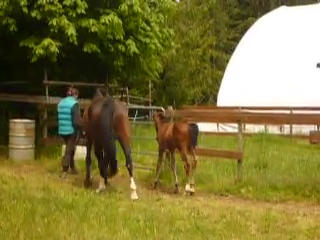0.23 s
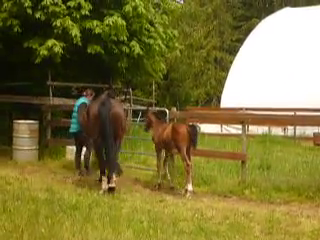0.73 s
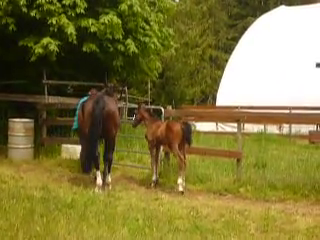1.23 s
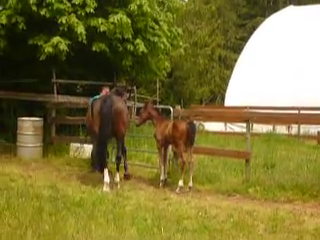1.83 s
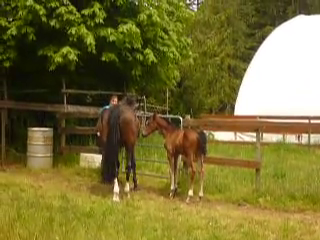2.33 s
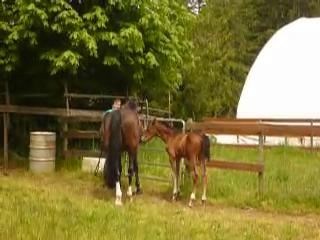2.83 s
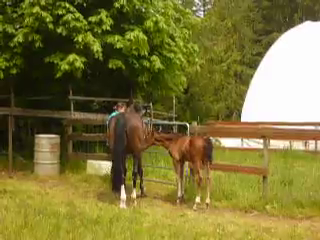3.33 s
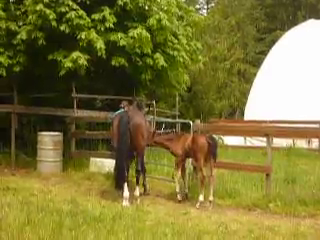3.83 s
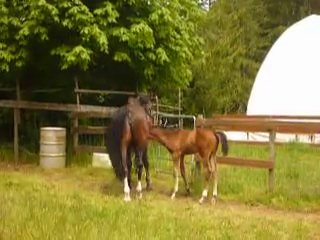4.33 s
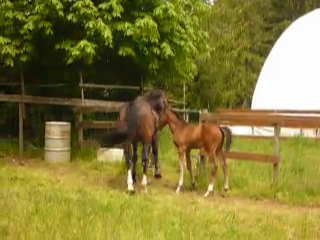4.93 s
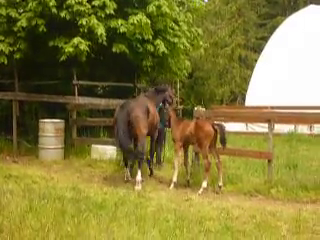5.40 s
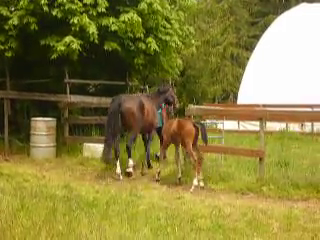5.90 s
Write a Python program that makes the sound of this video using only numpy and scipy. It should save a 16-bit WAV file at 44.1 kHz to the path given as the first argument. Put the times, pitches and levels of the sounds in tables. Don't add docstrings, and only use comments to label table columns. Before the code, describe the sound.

A horse whinnies loudly at once in an open paddock, then ticks, hoof scuffs and metal rings, before a longer quavering whinny and a blown breath.

```python
import sys
import numpy as np
from scipy import signal
from scipy.fft import rfft, irfft
from scipy.io import wavfile
from scipy.ndimage import uniform_filter1d

SR = 44100
rng = np.random.default_rng(int(sys.argv[2]) if len(sys.argv) > 2 else 0)


def volts_from_db(level):
    exponent = np.asarray(level, float) / 20
    return 10 ** exponent


def file_out(sig):
    cols = np.atleast_2d(sig).T
    lim = np.clip(cols, -1, 1)
    pcm = np.round(lim * 32767).astype(np.int16)
    wavfile.write(sys.argv[1], SR, pcm)


N = 271700
TIME, HZ = np.arange(N) / SR, np.fft.rfftfreq(N, 1 / SR)

# f/Hz, level per Hz/dB
HUSH_SPECTRUM = [(53, -63), (90, -22), (334, -7), (448, -5.5), (491, -5.5), (809, -6.5), (1240, -9.5),
                 (1630, -12), (2890, -14), (7400, -20.5), (9620, -26.5), (16300, -120)]
# t/s, peak level/dB, f/Hz
TICKS = [
    (1.5544, -36, 5000),
    (1.702, -24, 5200),
    (1.72, -20, 5900),
    (1.7474, -27, 4600),
    (1.7779, -29, 4600),
    (1.7853, -24, 4700),
    (2.5664, -37, 6000),
    (5.2051, -22, 6800),
    (5.3572, -28, 5500),
]
# t/s, level/dB, centre f/Hz, decay/s
HOOVES = [(1.866, -38.5, 2200, 0.037), (2.301, -45, 2000, 0.031), (2.364, -52, 1800, 0.029),
          (2.4, -39, 3000, 0.02), (2.472, -46.5, 600, 0.032), (2.551, -43.5, 1710, 0.03),
          (2.776, -40.5, 1890, 0.025), (2.836, -38, 1410, 0.04), (3.845, -35, 880, 0.0092),
          (3.876, -27.5, 810, 0.024), (3.93, -45, 780, 0.011), (5.365, -34.5, 1500, 0.0065)]
# t/s, f/Hz, level/dB, t60/s
GATE_RINGS = [(1.877, 2640, -42, 0.16), (1.9, 3250, -47.5, 0.46), (1.94, 2460, -48, 0.24),
              (2.364, 2310, -40, 0.13), (2.368, 1297, -41, 0.13), (2.402, 2266, -36, 0.11),
              (2.401, 3120, -43, 0.099), (2.549, 1640, -46, 0.22), (2.823, 3270, -47, 0.59),
              (2.84, 814, -41, 0.16), (2.86, 2650, -44, 0.19), (2.866, 1850, -43, 0.36),
              (3.846, 918, -32, 0.11), (3.883, 1010, -33.5, 0.087), (3.93, 988, -31, 0.075)]
# t/s, level/dB
BREATHS = [
    [(2.23, -92), (2.26, -55.5), (2.4, -49), (2.6, -51), (2.85, -50), (3.0, -52.5), (3.2, -53), (3.3, -74)],
    [(5.89, -78), (5.92, -53), (5.97, -44), (6.05, -47), (6.17, -49)],
]
# f/Hz, width/Hz, level/dB
NOSTRILS = [
    [(2000, 430, -3.5), (3620, 740, -8), (4760, 570, -4)],
    [(1260, 190, -5.5), (2370, 800, -5.5), (3620, 650, -1), (4800, 550, -5.5), (6030, 3400, -15)],
]

# full from t/s, full until t/s, level/dB, dip after it/dB
FIRST_QUAVERS = [(0.0, 0.015, -34.4, 2.2), (0.065, 0.119, -31.5, 6.2), (0.167, 0.223, -30.0, 5.3),
                 (0.295, 0.329, -27.5, 6.8), (0.419, 0.458, -28.5, 5.9), (0.495, 0.571, -32.3, 3.5),
                 (0.634, 0.695, -30.8, 3.4), (0.72, 0.815, -33.8, 5.9), (0.843, 0.93, -33.5, 6.5),
                 (0.973, 1.031, -33.5, 8.3), (1.1, 1.148, -33.3, 13.8), (1.213, 1.283, -42.5, 5.7),
                 (1.332, 1.395, -45.4, 7.8)]
SECOND_QUAVERS = [(3.253, 3.338, -39.9, 0), (3.359, 3.438, -37.4, 2.6), (3.471, 3.53, -36.1, 1.4),
                  (3.535, 3.7, -35.9, .7), (3.702, 3.827, -35.7, 1.5), (3.838, 3.919, -34.3, 2.2),
                  (3.934, 4.064, -34.8, 2.1), (4.078, 4.16, -35.8, 4.9), (4.195, 4.318, -35.3, 2),
                  (4.335, 4.438, -35.1, 3.3), (4.473, 4.555, -34.5, 6.3), (4.603, 4.672, -35.6, 4.9),
                  (4.722, 4.795, -37.6, 3.9), (4.83, 4.961, -39.9, 2.8), (4.986, 5.011, -38.5, 4.5),
                  (5.03, 5.076, -38.5, 3), (5.098, 5.191, -39.0, 2.7), (5.209, 5.303, -40.1, 9.2),
                  (5.357, 5.431, -42.6, 9.6)]
# t/s, level/dB
SECOND_ONSET = [
    (3.12, -71),
    (3.2, -56.5),
    (3.242, -45.5),
]
# f/Hz, width/Hz, level/dB
FIRST_THROAT = [(1010, 145, -17.5), (1283, 116, -4.5), (1520, 147, -3), (1877, 326, -3.5),
                (2586, 110, -18.5), (2950, 260, -14), (3704, 280, -23), (4390, 197, -17.5),
                (5215, 290, -23), (5690, 110, -26)]
SECOND_THROAT = [(1305, 210, -2.5), (1680, 430, -4), (1944, 310, -3.5), (2172, 131, -6), (3370, 710, -12),
                 (3700, 517, -9.5), (4890, 600, -17.5), (6120, 400, -26.5), (6760, 1100, -22.5)]
# f/Hz, width/Hz, level/dB
FIRST_CLOSING = [(980, 300, -13), (1268, 110, 1.0), (1500, 370, -4), (1780, 400, -4.0)] + FIRST_THROAT[4:]
SECOND_CLOSING = [(1243, 104, -1.5), (1484, 320, -8.5), (1850, 210, -4.5),
                  (2200, 164, -5)] + SECOND_THROAT[4:7] + [(6240, 370, -19.5)]
# t/s, level/dB
FIRST_MOUTH = [(0, -16), (.09, -22.5), (.2, -14.5), (.31, -13.5), (.53, -9.5), (.66, -11), (.9, -9),
               (1.12, -15), (1.3, -8.5)]
SECOND_MOUTH = [(3.3, -9), (3.5, -17), (3.62, -20), (3.76, -10.5), (4.5, -11.5), (4.64, -12), (4.76, -11),
                (4.89, -12), (5.4, -9)]
# t/s, rate f/Hz, jitter/0-1, air share/0-1
FIRST_RATTLE = [(0, 270, .12, .75), (.7, 250, .09, .6), (1.0, 240, .06, .5), (1.15, 200, .06, .5),
                (1.22, 110, .12, .4), (1.45, 95, .12, .4)]
SECOND_RATTLE = [(3.1, 240, .1, .8), (4.7, 215, .12, .66), (5.05, 190, .14, .55), (5.5, 150, .14, .55)]
# from t/s, until t/s, crest t/s, crest f/Hz, level/dB
FIRST_WHISTLE = [(0, .035, .02, 1410, -37), (.045, .09, .09, 1395, -35), (.15, .205, .197, 1395, -33),
                 (.385, .43, .428, 1385, -34), (.4, .46, .425, 1100, -43), (.505, .56, .53, 1060, -44),
                 (.52, .57, .545, 1314, -34.5), (.625, .665, .678, 1430, -34), (.75, .81, .772, 1270, -40),
                 (.865, .91, .86, 1310, -40), (.98, 1.02, 1.0, 1060, -46)]
FIRST_VOICED = [(.102, .118, .085, 1680, -31.5), (.206, .224, .19, 1700, -29),
                (.272, .338, .306, 1620, -28.7), (.43, .45, .428, 1650, -30), (.665, .68, .662, 1590, -31),
                (.725, .805, .77, 1610, -42.5), (.845, .92, .878, 1580, -42.5),
                (.97, 1.035, 1.0, 1505, -38.8), (1.095, 1.15, 1.12, 1430, -40)]
SECOND_WHISTLE = [
    (2.995, 3.25, 3.09, 1678, -48.5),
]
SECOND_SLIP = [(3.222, 3.267, 3.245, 1880, -47.5), (3.248, 3.333, 3.26, 1545, -43.5),
               (4.725, 4.812, 4.775, 1276, -42), (4.74, 4.8, 4.785, 1485, -43.3),
               (5.08, 5.119, 5.08, 1305, -46), (5.15, 5.209, 5.165, 1258, -43.5)]
SECOND_BREAKS = [
    (4.89, 4.93, 4.9, 1650, -43),
    (4.995, 5.055, 5.01, 1650, -44.5),
]
# crest t/s, length/s, level/dB
SECOND_VOICED = [(3.345, .135, -41), (3.497, .1, -40), (3.612, .12, -38.5), (3.737, .12, -39),
                 (3.862, .105, -39), (3.985, .075, -40), (4.112, .08, -38.8), (4.243, .085, -37),
                 (4.362, .075, -38.5), (4.496, .08, -37.5), (4.638, .08, -39)]
# f/Hz, level/dB
CONVERTER = [(20, -23.5), (60, -12), (200, -1), (7000, 0.5), (7500, -2.5), (7750, -12), (7850, -13.5),
             (8000, -45), (8200, -17), (8400, -14), (8700, -18), (9000, -28), (9300, -60)]


def shape(x, response):
    return irfft(rfft(x) * response, N)


def lose_low(x, corner_hz):
    return shape(x, (1j * HZ / (corner_hz + 1j * HZ)) ** 2)


def level(x, db):
    return x * volts_from_db(db) / np.sqrt(np.mean(x ** 2))


def resonances(hz, modes):
    hz = np.maximum(hz, 1)
    total = 0
    for k, (f, width, db) in enumerate(modes):
        total = total + (-1) ** k * volts_from_db(db) / (1 + .64j * (hz - f * f / hz) / width) ** 2
    return total


def on_log(hz, table):
    f, db = np.transpose(table)
    return volts_from_db(np.interp(np.log(hz + 1), np.log(f), db))


def walk(rate_hz):
    hold = int(SR / rate_hz)
    steps = np.repeat(rng.standard_normal(N // hold + 1), hold)
    return 1.3 * uniform_filter1d(uniform_filter1d(steps, hold), hold)[:N]


def hush():
    out, swell = 0, walk(0.48)
    noise = rfft(rng.standard_normal(N)) * on_log(HZ, HUSH_SPECTRUM[:-1])
    for octave in range(5, 15):
        band = np.clip(1 - np.abs(np.log2(HZ + 1) - octave), 0, 1)
        out = out + volts_from_db(0.34 * swell + 0.43 * walk(9.1)) * irfft(noise * band, N)
    return level(out, -47.5)


def ticks():
    out, t = np.zeros(N), TIME[:400]
    snap = np.exp(-t / 0.0002) + 0.25 * np.exp(-t / 0.00019)
    for s, db, hz in TICKS:
        out[int(s * SR + 30):][:400] += volts_from_db(db + 5.5) * snap * np.sin(2 * np.pi * hz * t)
    return lose_low(out, 1800)


def hooves():
    out, t = np.zeros(N), TIME[:12000]
    for s, db, hz, decay_s in HOOVES:
        body = 1 / (1 + .35j * (HZ / hz - hz / (HZ + 1))) ** 2
        dull = 1 / (1 + (HZ / 5200) ** 6)
        scuff = level(shape(rng.standard_normal(N), body * dull), db)[:len(t)]
        out[int(s * SR):][:len(t)] += scuff * np.exp(-t / decay_s) * np.minimum(t / 0.00062, 1)
    return lose_low(out, 120)


def gate():
    out, t = np.zeros(N), TIME[:12000]
    rattling = volts_from_db(3 * walk(160))
    for s, hz, db, t60 in GATE_RINGS:
        decay = np.exp(-np.log(1000) * t / t60)
        ring = decay * np.sin(2 * np.pi * hz * t) * np.minimum(t / 0.0019, 1)
        start = int(s * SR)
        out[start:][:len(t)] += np.sqrt(2) * volts_from_db(db - 3) * ring * rattling[start:][:len(t)]
    return lose_low(out, 120)


def breaths():
    out = 0
    for swell, modes in zip(BREATHS, NOSTRILS):
        db = np.interp(TIME, *np.transpose(swell), left=-90, right=-90)
        air = level(shape(rng.standard_normal(N), resonances(HZ, modes)), 0)
        out = out + volts_from_db(db + 1.0 + 0.91 * walk(40)) * air
    return out


def clear(rows, throat, bend, order, side_db, roll_db, wobble=0.0079, fall=1, overtone_db=0):
    out = np.zeros(N)
    drift, flutter = 1 + wobble * walk(150), volts_from_db(1.0 * walk(70))
    shimmer_db = 3.5 * walk(60)
    for (t0, t1, crest_s, crest_hz, db), curve in zip(rows, np.broadcast_to(bend, len(rows))):
        i = slice(int(max(t0 - .01, 0) * SR), int((t1 + 0.0092) * SR))
        off = np.clip(TIME[i], t0, t1) - crest_s
        sag = curve * np.where(off > 0, fall, 1) * off ** 2
        hz = crest_hz * (1 - np.minimum(sag, .16)) * drift[i]
        phase = 2 * np.pi * np.cumsum(hz / order) / SR
        fade = 1.1 * np.sin(np.linspace(0, np.pi, len(hz))) ** .6
        at_line = resonances(np.median(hz), throat)
        for k in range(1, int(6000 * order / crest_hz)):
            gain = np.abs(resonances(hz * k / order, throat) / at_line)
            if k == order:
                gain = np.minimum(gain, 1.3) ** 0.6
            else:
                partial_db = side_db - roll_db * abs(k - order) / order
                partial_db = partial_db + overtone_db * (k % order == 0)
                gain = gain * volts_from_db(partial_db + np.roll(shimmer_db, 997 * k)[i])
            out[i] += np.sqrt(2) * volts_from_db(db) * fade * gain * np.sin(k * phase + k * k)
    return out * flutter


def rattle(effort_db, folds):
    s, *columns = np.transpose(folds)
    hz, jitter, air = (np.interp(TIME, s, c) for c in columns)
    push_db = np.clip(effort_db - uniform_filter1d(effort_db, size=5000), -5, 5)
    hz = hz * (1 + .03 * push_db)
    phase = np.cumsum(hz * (1 + jitter * walk(200))) / SR
    cycle = phase.astype(int)
    size = volts_from_db(1.5 * rng.standard_normal(N // 50))[cycle]
    pulses = np.diff(cycle, prepend=0) * size * np.sqrt(SR / hz)
    puffs = size * (.6 + .9 * np.exp(-(phase - cycle) / .4)) * rng.standard_normal(N)
    return np.sqrt(1 - air) * pulses + np.sqrt(air) * puffs


def whinny(quavers, onset, mouth, folds, throat, late, late_s, lines, hoarse_db, upper_db, upper_swing):
    start, end, top_db, dip_db = np.transpose(quavers)
    last_gap_s = .085
    dip_s = end + .5 * (np.append(start[1:], end[-1] + last_gap_s) - end)
    shut_s, low_db = np.minimum(end + .02, dip_s), top_db - dip_db - 1.2
    points = np.transpose([start, top_db, end, top_db, shut_s, low_db + .8, dip_s, low_db])
    points = onset + points.reshape(-1, 2).tolist() + [(dip_s[-1] + 0.017, -80)]
    effort_db = uniform_filter1d(np.interp(TIME, *np.transpose(points)), size=400)
    effort, source = volts_from_db(effort_db + hoarse_db), rattle(effort_db, folds)
    line_power = uniform_filter1d(lines ** 2, size=900)
    left = np.sqrt(np.maximum(effort ** 2 - 1.25 * line_power, .15 * effort ** 2))

    def voice(modes):
        return level(shape(source, resonances(HZ, modes)), 0)

    split_hz = 2400
    early, closing = (voice([m for m in t if m[0] < split_hz]) for t in (throat, late))
    high, last = (voice([m for m in t if m[0] >= split_hz]) for t in (throat, late))
    share = np.clip((TIME - late_s) / 0.55, 0, 1)
    main = early + share * (closing - early)
    upper = high + share * (last - high)
    middle_s = (start + end) / 2
    gap = np.interp(TIME, np.ravel(np.transpose([middle_s, dip_s])), np.tile([0, 1], len(start)))
    sag_db = effort_db - np.interp(TIME, middle_s, top_db) - 11 * gap ** 1.5
    lag_s = .008
    swing_db = upper_swing * np.roll(sag_db, int(lag_s * SR))
    bright = volts_from_db(np.interp(TIME, *np.transpose(mouth)) + upper_db + swing_db)
    return lines + left * main + effort * bright * upper


def wavering_line():
    s, length, db = np.transpose(SECOND_VOICED)
    age = s - 3.3
    crest_hz = 1706 - 75 * age
    rows = np.transpose([s - length / 2, s + length / 2, s, crest_hz, db])
    bend = 63 * age
    out = clear(rows[:7], SECOND_THROAT, bend[:7], order=8, side_db=-7.5, roll_db=6.0, wobble=.005,
                overtone_db=4)
    return out + clear(rows[7:], SECOND_THROAT, bend[7:], order=7, side_db=-7.5, roll_db=7.0, wobble=.005,
                       overtone_db=10)


def first_horse():
    lines = clear(FIRST_WHISTLE, FIRST_THROAT, bend=62, order=1, side_db=5, roll_db=10.0)
    lines += clear(FIRST_VOICED, FIRST_THROAT, bend=85, order=3, side_db=-3, roll_db=4.5, fall=1.55)
    return whinny(FIRST_QUAVERS, [], FIRST_MOUTH, FIRST_RATTLE, FIRST_THROAT, FIRST_CLOSING, 0.7, lines,
                  hoarse_db=-.4, upper_db=2.6, upper_swing=0.32)


def second_horse():
    lines = clear(SECOND_WHISTLE, SECOND_THROAT, bend=-1.4, order=1, side_db=6, roll_db=3.5, wobble=.003)
    lines += clear(SECOND_SLIP, SECOND_THROAT, bend=22, order=7, side_db=-9, roll_db=6.0)
    lines += wavering_line()
    lines += clear(SECOND_BREAKS, SECOND_THROAT, bend=60, order=4, side_db=3, roll_db=8.0)
    return whinny(SECOND_QUAVERS, SECOND_ONSET, SECOND_MOUTH, SECOND_RATTLE, SECOND_THROAT, SECOND_CLOSING,
                  4.32, lines, hoarse_db=0.02, upper_db=3.0, upper_swing=0.19)


def scene():
    near = hooves() + gate() + breaths() + first_horse() + second_horse()
    tail = rng.standard_normal(N) * np.exp(-np.log(1000) * TIME / .25) * (TIME > .015)
    echo = shape(near, rfft(tail / np.sqrt(np.sum(tail ** 2))))
    return np.tile(hush() + ticks() + near + volts_from_db(-19) * echo, (2, 1))


def low_pass(x):
    return signal.sosfilt(signal.butter(12, 8900, fs=SR, output="sos"), x)


def record(dry):
    notch_hz, width_hz = 2914, 250
    notch = 1 - 1 / (1 + 2j * (HZ - notch_hz) / width_hz)
    mono = shape(dry[0], notch * on_log(HZ, CONVERTER))
    return low_pass(np.tile(mono, (2, 1)))


dry = scene()
out = record(dry)
file_out(out)
```